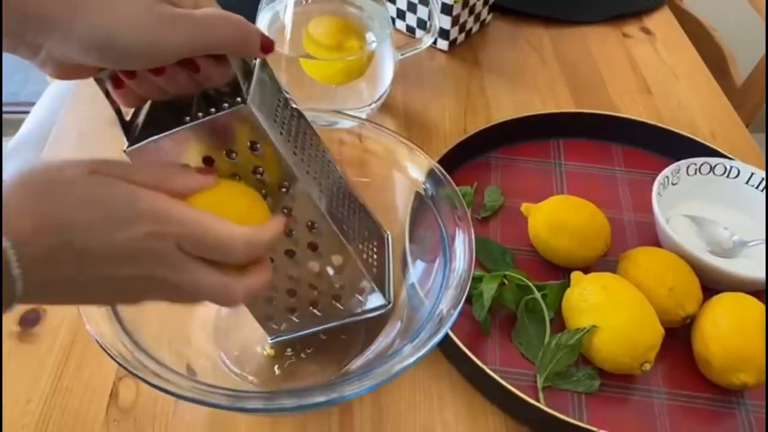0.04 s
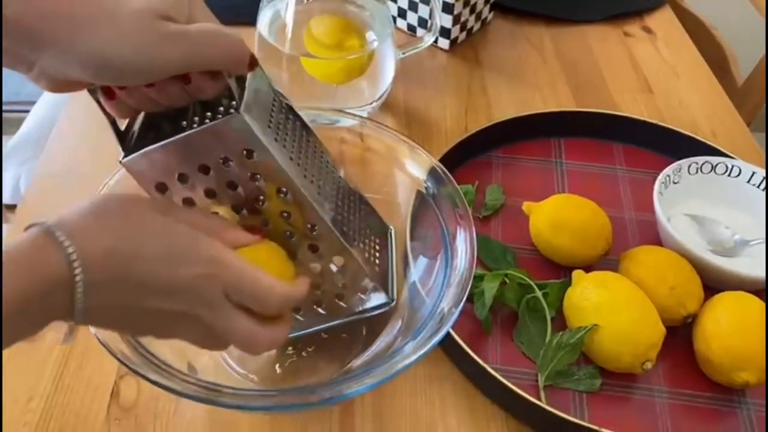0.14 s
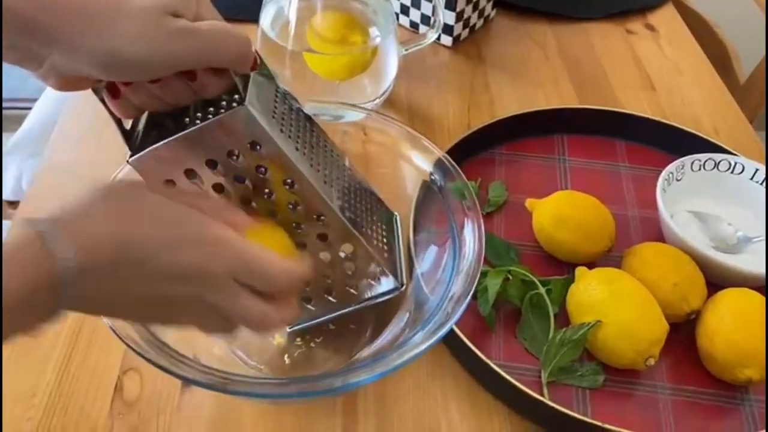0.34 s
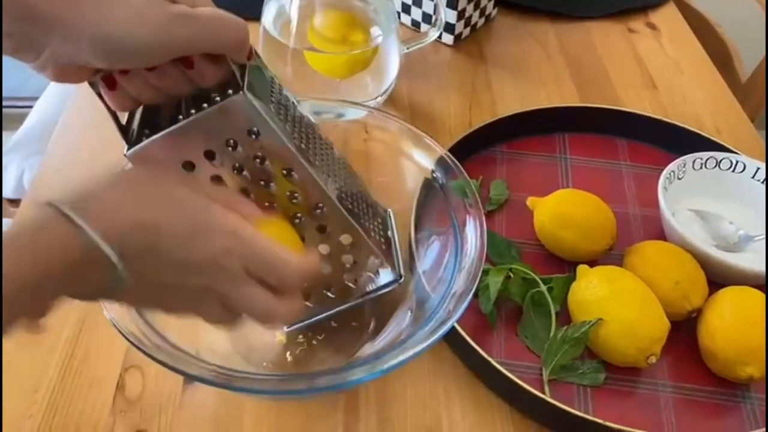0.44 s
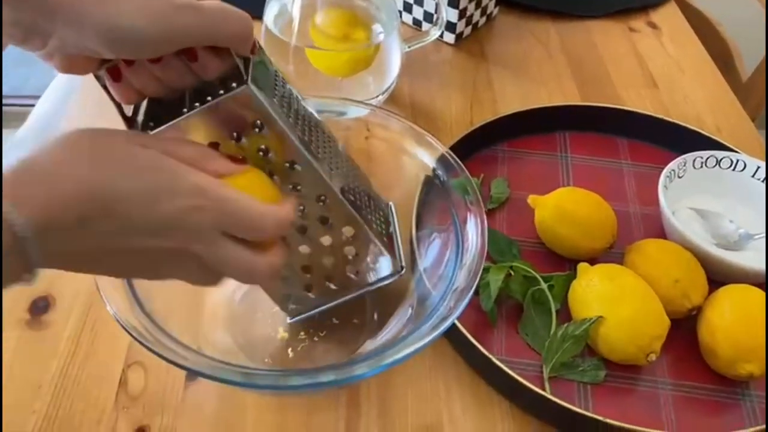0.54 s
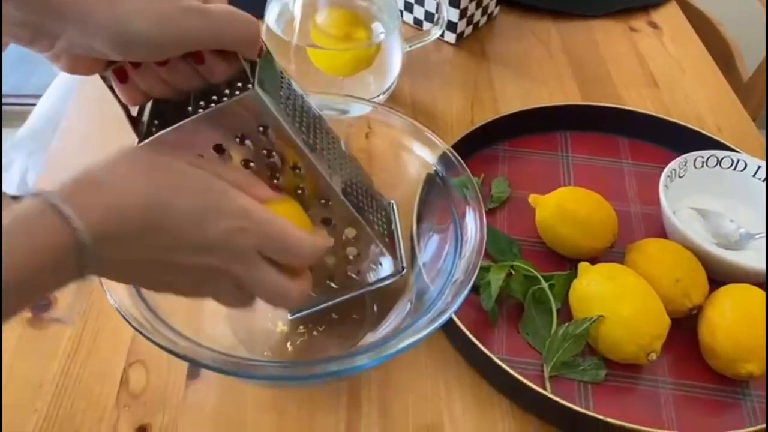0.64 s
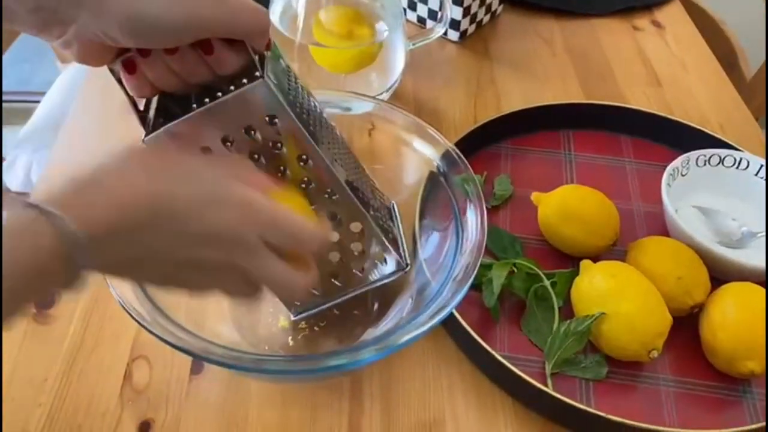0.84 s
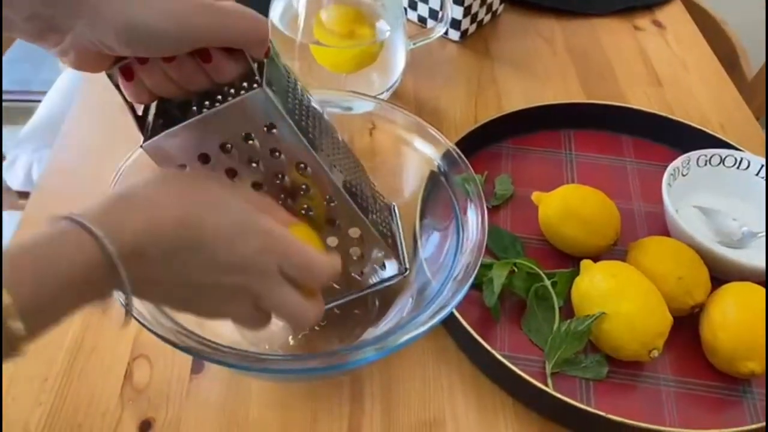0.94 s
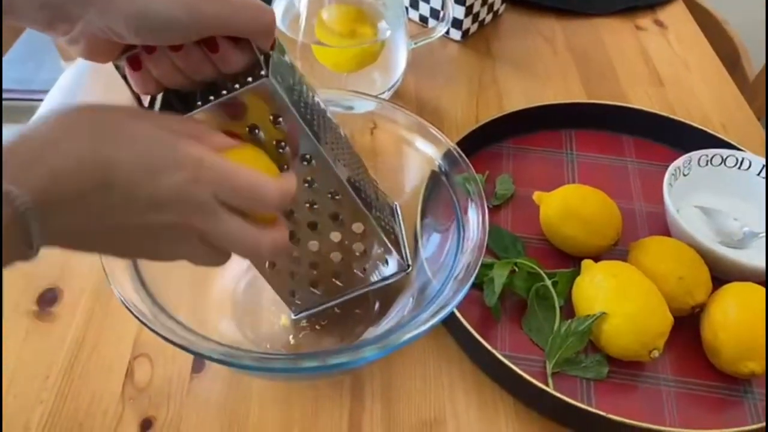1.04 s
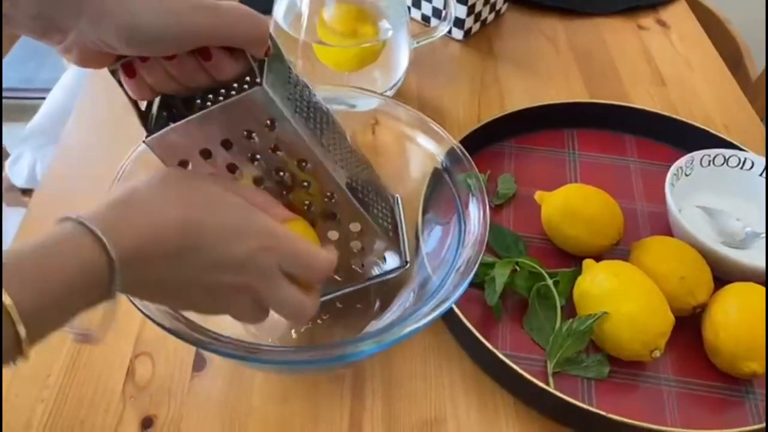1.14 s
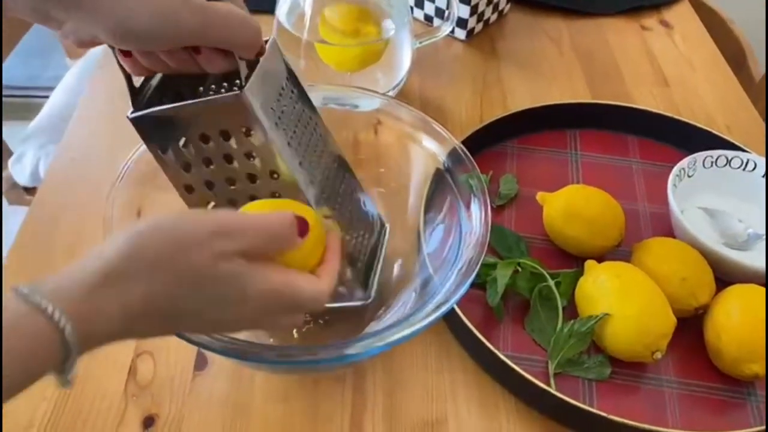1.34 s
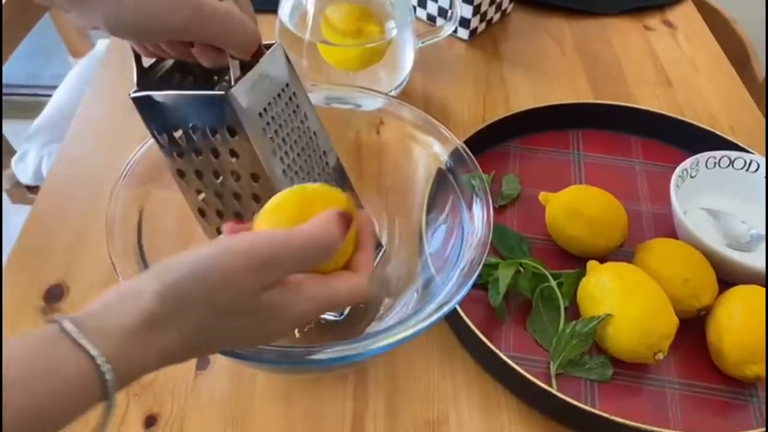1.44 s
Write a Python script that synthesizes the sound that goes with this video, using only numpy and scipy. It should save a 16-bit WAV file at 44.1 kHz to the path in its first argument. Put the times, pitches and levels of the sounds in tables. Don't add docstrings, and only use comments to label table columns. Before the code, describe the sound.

Lemon grating on a steel box grater, close in a small reverberant kitchen with faint low hum. Soft rasps come at 0.1-0.2 and 0.4 s, with hollow bowl-on-table knocks and bounces near 0.2, 0.45 and 0.72 s. Bright glass clinks sound at 0.1, 0.64, 1.06 and 1.13 s. The strongest rasp, around 0.9-0.97 s, squeaks briefly; another gritty stroke at 1.15-1.25 s fades away.

```python
import sys
import numpy as np
from scipy import signal
from scipy.fft import rfft, irfft
from scipy.io import wavfile

SR = 44100
rng = np.random.default_rng(int(sys.argv[2]) if len(sys.argv) > 2 else 0)


def to_wav(sig):
    pcm = np.clip(np.atleast_2d(sig), -1, 1) * 32767
    pcm = np.round(pcm).astype(np.int16)
    wavfile.write(sys.argv[1], SR, pcm.T)


def ratio_of_db(decibels):
    return 10 ** (np.asarray(decibels, float) / 20)


N = 66150

# pitch_hz, level_db, t60_s
TABLE_MODES = [(89, -57, 0.092), (121.8, -2.5, 0.4), (132, -37, 0.076), (220, -8.5, 0.15), (254, -8, 0.1),
               (316.4, 2, 0.22), (385, -2, 0.15), (402, 0.5, 0.037), (500.4, 0.5, 0.16), (596.5, -9, 0.32),
               (661, -5.5, 0.074), (800, -21, 0.043), (880, -45, 0.036), (1330, 4, 0.009)]


def at_hz(points, hz):
    table_hz, values = np.transpose(points)
    return np.interp(np.log(np.maximum(hz, 1)), np.log(table_hz), values)


def rms_one(x):
    return x / np.sqrt(np.mean(x ** 2) + 1e-20)


def filtered_noise(order, hz, kind):
    return signal.sosfilt(signal.butter(order, hz, kind, fs=SR, output="sos"), rng.standard_normal(N))


def colour(x, spectrum):
    size = 4096
    cepstrum = irfft(np.log(ratio_of_db(at_hz(spectrum, np.arange(size // 2 + 1) * SR / size))))
    cepstrum[1:size // 2] *= 2
    cepstrum[size // 2 + 1:] = 0
    response = irfft(np.exp(rfft(cepstrum)))
    out = signal.fftconvolve(np.atleast_2d(x), response[None], axes=-1)
    return out[..., :N].reshape(np.shape(x))


def ring(x, hz, t60):
    r, w = ratio_of_db(-60 / (t60 * SR)), 2 * np.pi * hz / SR
    return signal.lfilter([0, np.sin(w)], [1, -2 * r * np.cos(w), r * r], x + 1e-18)


def peak(x, hz, width):
    r = np.exp(-np.pi * width / SR)
    poles = [1, -2 * r * np.cos(2 * np.pi * hz / SR), r * r]
    return signal.lfilter([(1 - r * r) / 2, 0, (r * r - 1) / 2], poles, x)


def decays(start_s, level_db, t60):
    jumps = np.zeros(N)
    jumps[(start_s * SR).astype(int)] = ratio_of_db(level_db)
    return signal.lfilter([1], [1, -ratio_of_db(-60 / (t60 * SR))], jumps + 1e-18)


def strikes(times, levels_db, modes, spread_db):
    chatter_s = 0.003
    out = np.zeros(N)
    luck = rng.standard_normal((len(times), len(modes)))
    late = rng.random((len(times), len(modes)))
    for k, (hz, db, t60) in enumerate(modes):
        clicks = np.zeros(N)
        starts = ((times + chatter_s * late[:, k]) * SR).astype(int)
        clicks[starts] = ratio_of_db(levels_db + db + spread_db * luck[:, k])
        out += ring(clicks, hz, t60)
    return out


def swings(rows):
    out, t = np.zeros(N), np.arange(N) / SR
    for start_s, db, hz, cycles in rows:
        turn = np.clip((t - start_s) * hz / cycles, 0, 1)
        out -= ratio_of_db(db) * np.sin(np.pi * turn) ** 2 * np.sin(2 * np.pi * hz * (t - start_s))
    return out


def hush():
    # pitch_hz, level_db (per Hz)
    floor = [(30, 0.5), (70, -11.5), (140, -17), (300, -18), (950, -37.5), (3300, -41), (8000, -75),
             (12000, -75)]
    # pitch_hz, level_db (peak)
    hums = [(135.3, -43), (146.1, -41)]
    t = np.arange(N) / SR - 0.04
    air = rms_one(colour(rng.standard_normal((2, N)), floor))
    return ratio_of_db(-38.5) * air + sum(ratio_of_db(db) * np.sin(2 * np.pi * hz * t) for hz, db in hums)


def rumble():
    # time_s, level_db
    lean = [(.08, -15), (.11, -3.5), (.19, 0.5), (.6, -5), (0.658, 6.5), (.72, 1.5), (.88, -3), (0.952, 4),
            (1.04, -2.5), (1.09, 4), (1.15, 6), (1.23, -2), (1.3, -4.5), (1.46, -8)]
    shake = rng.standard_normal(N) * ratio_of_db(np.interp(np.arange(N) / SR, *np.transpose(lean)))
    damping = 0.46
    table = sum(ratio_of_db(db) * ring(shake, hz, t60 * damping) for hz, db, t60 in TABLE_MODES)
    return ratio_of_db(-40) * rms_one(table)


def clinks():
    # start_s, level_db, crack_db (over the ring)
    hits = [(.006, -61.5, 9.5), (0.0974, -34, 4), (0.19, -41.5, 1), (.247, -58.5, 10.5),
            (0.3418, -57, 14.5), (0.459, -41.5, 3.5), (0.611, -49, -10), (0.6405, -24, -2), (.815, -53, 8),
            (0.8918, -51.5, 16.5), (1.056, -29.5, -0.5), (1.128, -24, -3.5), (1.155, -53.5, 12),
            (1.3613, -64.5, 13), (1.482, -51, 7)]
    # pitch_hz, level_db, t60_s
    glass = [(1920, -16, 0.053), (2755, -8, 0.054), (4092, -2.5, 0.026), (5230, -9.5, 0.05),
             (6200, -16, 0.041), (6654, -9, 0.069), (6970, -4, 0.045), (7240, -2.5, 0.041),
             (7840, 1, 0.039), (8330, 0.5, 0.042), (9600, 4.5, 0.044), (10000, -4.5, 0.1), (10790, -5, 0.1),
             (11550, -4, 0.075)]
    # pitch_hz, level_db (per Hz)
    crack_colour = [(600, 3.5), (1500, 5.5), (3000, 1.5), (4200, 4), (7500, 5), (10000, 1.5), (12000, -30),
                    (13500, -20)]
    start_s, db, crack_db = np.transpose(hits)
    shape = decays(start_s, db + crack_db - 4.5, t60=0.1)
    noise = rng.standard_normal(N)
    crack = colour(shape * noise, crack_colour) / np.std(colour(noise, crack_colour))
    return crack + strikes(start_s, db - 7, glass, spread_db=2)


def thuds():
    # start_s, level_db, pitch_hz, cycles
    first_knock = [(.205, -18, 800, 6.7), (0.206, -30, 1300, 14), (.208, -18.5, 374, 2.7),
                   (0.211, -14.5, 179, 1.6), (.212, -18.5, 643, 7.1), (0.2251, -12, 287, 3.2),
                   (.227, -16.5, 654, 8.), (.234, -12.5, 199, 2.15), (0.239, -24.5, 1098, 9.7),
                   (.242, -15.5, 333, 3.86), (.246, -23.5, 615, 5.5), (0.249, -18.5, 116.4, 4.6),
                   (.254, -21.5, 400, 4.8), (.256, -27, 223, 3.6), (.262, -29.5, 610, 11.5),
                   (.268, -19.5, 252.6, 7.3), (0.284, -34, 207, 4.2), (.295, -33, 374, 4.8),
                   (0.301, -29, 221, 6), (0.319, -32.5, 120, 6.)]
    # start_s, level_db, pitch_hz, cycles
    second_knock = [(.425, -26.5, 373, 9.2), (0.447, -22.5, 1385, 11), (.4485, -14.5, 790, 4.4),
                    (.449, -14.5, 211, 3.8), (.451, -11, 638, 7.7), (.452, -15, 440, 4.9),
                    (0.461, -21, 85, 2.54), (.464, -14.5, 505, 3.16), (.464, -21, 702, 18),
                    (.473, -17, 393, 4.64), (.482, -17.5, 331, 3.14), (.492, -20, 387, 4.4),
                    (.494, -24.5, 612, 9.9), (.497, -21, 202, 2.46), (.51, -20, 212, 5.4),
                    (.52, -18.5, 349, 3.6), (.534, -31, 624, 17.3), (.537, -26.5, 350, 5.3),
                    (.548, -27, 216, 7.1), (.568, -29, 582, 4.8), (0.571, -43, 210, 4.1)]
    # start_s, level_db, pitch_hz, cycles
    third_knock = [(.72, -25.5, 880, 3.4), (.72, -17, 253, 3.24), (.722, -19, 663, 8.3),
                   (.726, -19.5, 485, 6.1), (.732, -28, 198, 2.3), (.734, -23, 649, 6.8),
                   (.736, -19.5, 317, 4.4), (0.746, -21.5, 133, 2.5), (.752, -34, 303, 6),
                   (.766, -24.5, 330, 4.4), (0.791, -27, 147, 2.6)]
    # start_s, level_db, pitch_hz, cycles
    soft_swings = [(.03, -44.5, 297, 8.6), (.096, -34, 332, 3.8), (.64, -34.5, 598, 15),
                   (0.816, -34, 255.4, 11.3), (0.851, -41, 139, 4.3), (.91, -36.5, 318.9, 19),
                   (0.946, -32.5, 144, 4.7), (.98, -30, 147, 7.4), (1.099, -28, 138, 7.1),
                   (1.13, -36, 487.4, 30), (1.155, -32, 319, 9.), (1.169, -25.5, 117.5, 8.5),
                   (1.21, -38, 321, 11.6), (1.24, -30.5, 118.5, 6.), (1.483, -27.5, 263, 3.3)]
    push = swings(first_knock + second_knock + third_knock + soft_swings)
    table = np.zeros(N)
    for k, (hz, db, t60) in enumerate(TABLE_MODES):
        table += (-1) ** k * ratio_of_db(db) * hz / SR * ring(push, hz, t60)
    rattle_t60_s = 0.16
    energy = signal.lfilter([1], [1, -ratio_of_db(-120 / (rattle_t60_s * SR))], push ** 2 + 1e-18)
    shaken = np.sqrt(energy / SR * 100)
    grit = rms_one(filtered_noise(3, [540, 1300], "band"))
    return ratio_of_db(-0.4) * push + ratio_of_db(-13) * table + ratio_of_db(-18) * shaken * grit


def teeth_rasp():
    # time_s, level_db
    pressure = [(0.089, -67), (0.124, -46), (0.193, -42), (.25, -51), (.34, -57.5), (0.371, -43),
                (0.422, -40.5), (0.602, -55.5), (0.678, -44), (0.876, -57), (0.9, -41), (0.967, -36),
                (0.98, -49), (1.12, -48.5), (1.196, -39), (1.287, -54), (1.37, -50), (1.46, -69)]
    # start_s, level_db (peak)
    bites = [(.652, -41), (.668, -30), (0.897, -45), (.919, -37), (.929, -37), (.9387, -30), (0.947, -35),
             (.955, -35), (0.9615, -32.5), (.968, -31), (1.144, -34), (1.163, -34), (1.178, -34),
             (1.19, -45), (1.204, -35), (1.215, -46.5), (1.228, -42)]
    # pitch_hz, width_hz, level_db
    steel = [(1152, 38, 9.5), (1256, 42, 8.5), (1780, 67, -8), (2065, 45, -23), (2440, 69, 2),
             (3617, 92, -7), (4150, 32, -25), (5470, 53, -8), (6200, 140, -6.5), (7030, 140, -3)]
    # pitch_hz, level_db (per Hz)
    rasp_colour = [(400, -2.5), (780, -10), (1150, -2.5), (2100, 1.5), (3200, -11.5), (4500, -8),
                   (7500, -13.5), (12000, -21)]
    start_s, bite_db = np.transpose(bites)
    level = ratio_of_db(np.interp(np.arange(N) / SR, *np.transpose(pressure)))
    level = level + decays(start_s, bite_db - 9.5, t60=0.034)
    teeth_per_s = 2500
    teeth = rms_one(rng.choice([-1, 1], N) * (rng.random(N) < teeth_per_s / SR))
    sheet = sum(ratio_of_db(db) * peak(teeth * level, hz, width) for hz, width, db in steel)
    plain = colour(teeth * level, rasp_colour) / np.std(colour(teeth, rasp_colour))
    return plain + ratio_of_db(6) * sheet


def pings():
    # start_s, level_db, pitch_hz, t60_s
    catches = [(.12, -40, 1330, 0.67), (.193, -38, 6400, .07), (.222, -41, 2440, 0.2),
               (.39, -33, 1632, 0.13), (.66, -37, 1888, 0.13), (0.926, -35.5, 4150, 0.15),
               (.935, -42, 2065, 0.22), (1.06, -37, 10790, .06), (1.133, -36, 10790, 0.041),
               (1.054, -28, 3750, 0.041), (1.056, -47, 2720, 0.17), (1.155, -39, 3560, 0.099),
               (1.36, -39, 1840, 0.089)]
    start_s, db, hz, t60 = np.array(catches).T[:, :, None]
    after = np.maximum(np.arange(N) / SR - start_s, 0)
    rise_s = 0.0042
    swell = 1 - np.exp(-after / rise_s)
    return (ratio_of_db(db - 60 * after / t60) * swell * np.sin(2 * np.pi * hz * after)).sum(axis=0)


def squeaks():
    # start_s, level_db, pitch_hz, cycles
    drags = [
        (.938, -40, 1152, 17),
        (.952, -29.5, 1152, 27),
        (.977, -37, 1152, 32),
    ]
    flutter = rms_one(filtered_noise(2, 120, "low"))
    return swings(drags) * (1 + 0.29 * flutter)


def kitchen(x):
    # pitch_hz, t60_s
    room_t60 = [(100, 0.42), (400, 0.39), (1500, 0.33), (5000, 0.21), (12000, 0.16)]
    gap_s = 0.0022
    t, tail = np.arange(SR // 2) / SR, 0
    fade_in = np.clip(t / gap_s - 1, 0, 1)
    white = rng.standard_normal((2, SR // 2))
    edges = 40 * 2. ** np.arange(10)
    for low, high in zip(edges, edges[1:]):
        band = signal.sosfilt(signal.butter(2, [low, high], "band", fs=SR, output="sos"), white)
        t60 = at_hz(room_t60, np.sqrt(low * high))
        unit_energy = np.sqrt(2 * np.log(1000) / t60 / SR)
        tail = tail + band * ratio_of_db(-60 * t / t60) * fade_in * unit_energy
    return signal.fftconvolve(x[None], tail, axes=1)[:, :N]


def scene():
    clink, thud, ping = clinks(), thuds(), pings()
    stroke = rumble() + teeth_rasp() + squeaks()
    wet = ratio_of_db(3.5) * stroke + ratio_of_db(7.5) * clink + ratio_of_db(1.5) * thud + ratio_of_db(-4) * ping
    return stroke + clink + ping + thud + kitchen(wet) + hush()


def top_cut(x):
    return signal.sosfilt(signal.butter(12, 12850, fs=SR, output="sos"), x)


def record(dry):
    # pitch_hz, side_gain_db
    width = [(70, -24), (600, 6), (3000, 5.5), (4400, -9), (5600, 1), (6800, -27), (9000, -27),
             (12000, -24)]
    # pitch_hz, left_over_right_db
    tilt = [(150, 0), (550, 2), (1900, -.3), (3100, 4.5), (4300, 2.5), (5600, 4.5), (6700, .5), (7500, 0)]
    # pitch_hz, phase_turns
    port_turns = [(7200, 0), (7750, .2), (8250, .36), (8450, .5), (9550, .5), (9850, .72), (10800, 1)]
    dry = signal.sosfilt(signal.butter(3, 68, "high", fs=SR, output="sos"), dry)
    dry = signal.sosfilt(signal.cheby2(12, 32, 11450 * 1.04, fs=SR, output="sos"), dry)
    left, right = rfft(dry, 2 * N)
    hz = np.arange(N + 1) * SR / (2 * N)
    mid = (left + right) / 2
    side = (left - right) / 2 * ratio_of_db(at_hz(width, hz))
    to_left = ratio_of_db(at_hz(tilt, hz) / 2) * np.exp(-1j * np.pi * at_hz(port_turns, hz))
    to_right = np.conj(to_left) / np.abs(to_left) ** 2
    mix = irfft(np.array([(mid + side) * to_left, (mid - side) * to_right]))[:, :N]
    return top_cut(mix)


dry = scene()
out = record(dry)
to_wav(out)
```